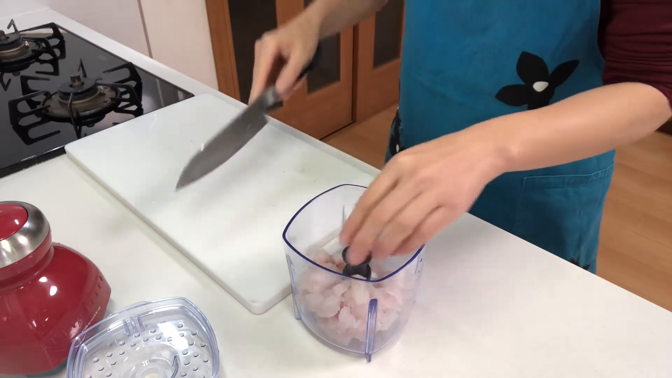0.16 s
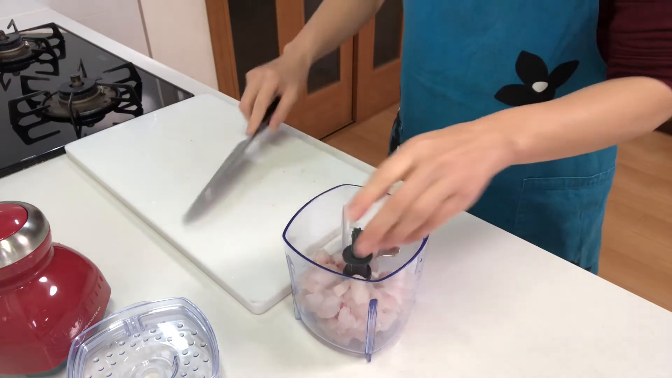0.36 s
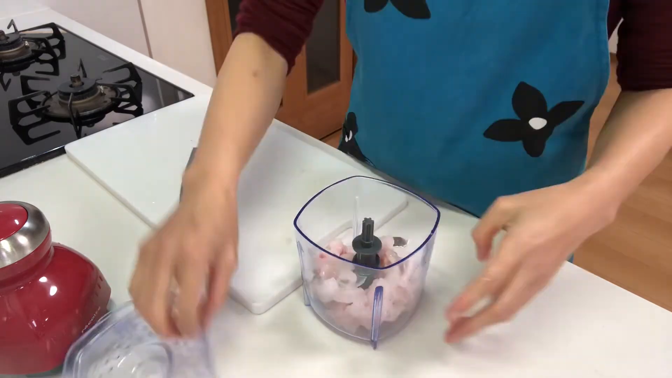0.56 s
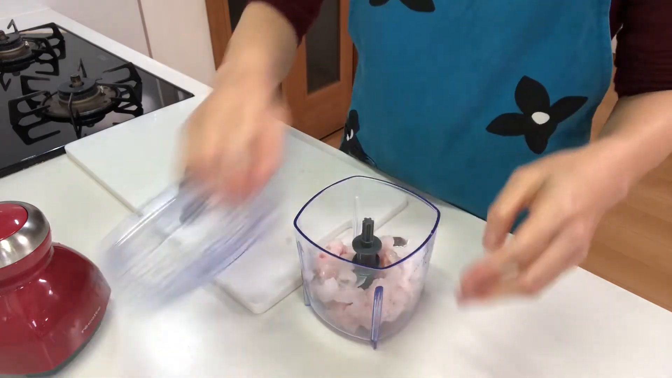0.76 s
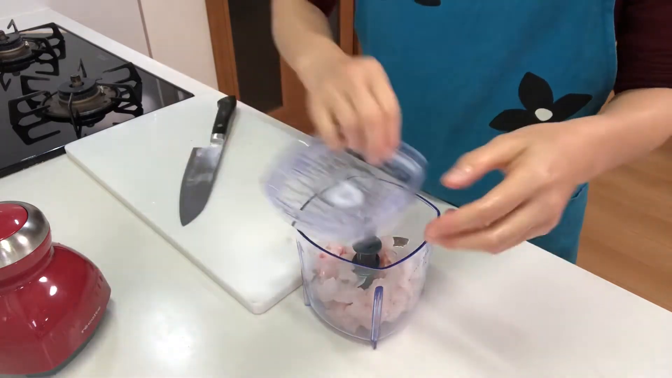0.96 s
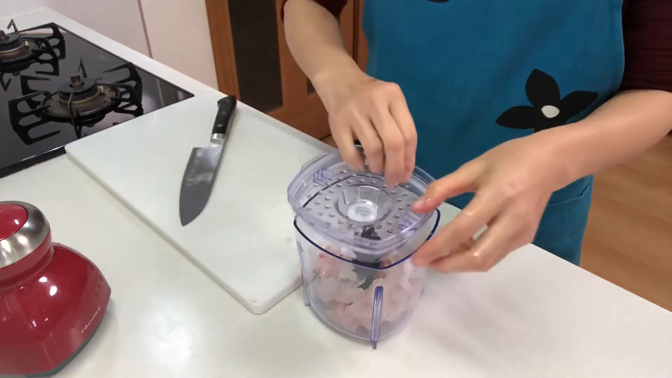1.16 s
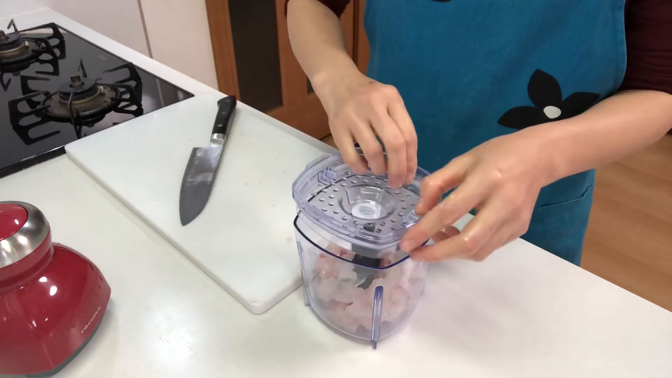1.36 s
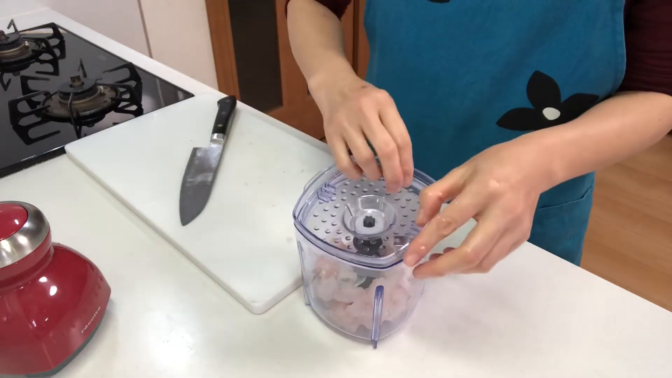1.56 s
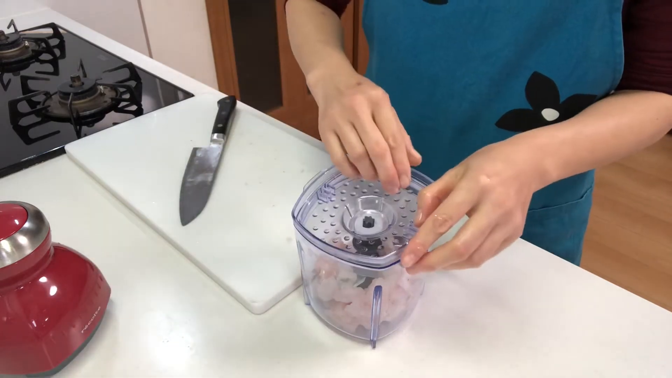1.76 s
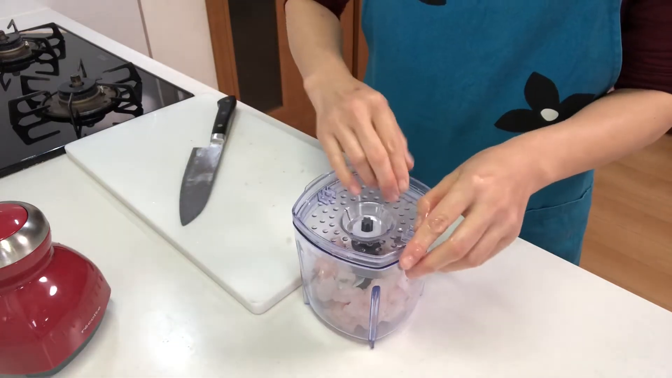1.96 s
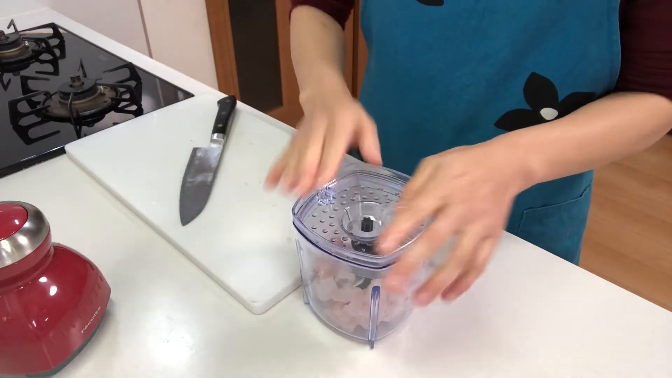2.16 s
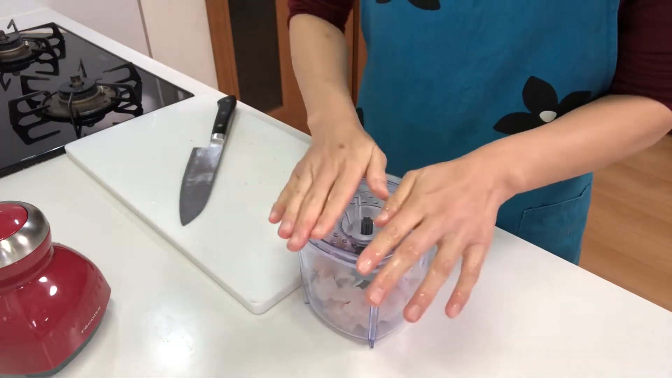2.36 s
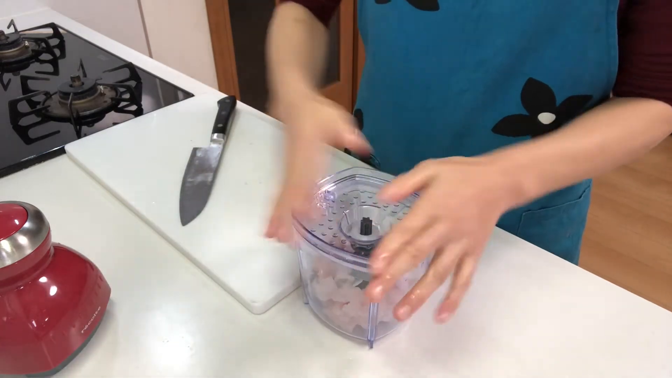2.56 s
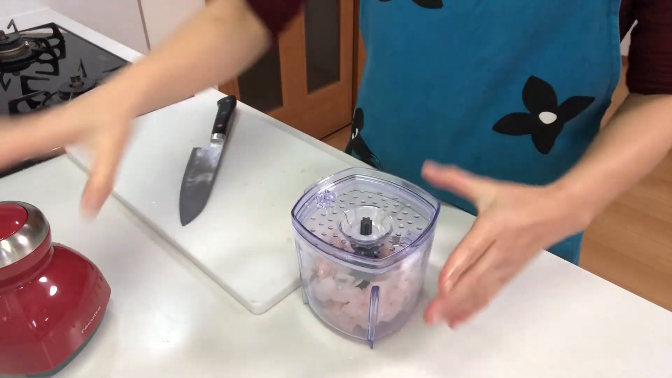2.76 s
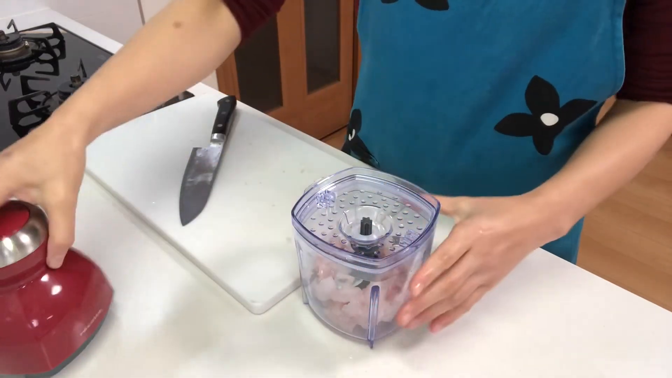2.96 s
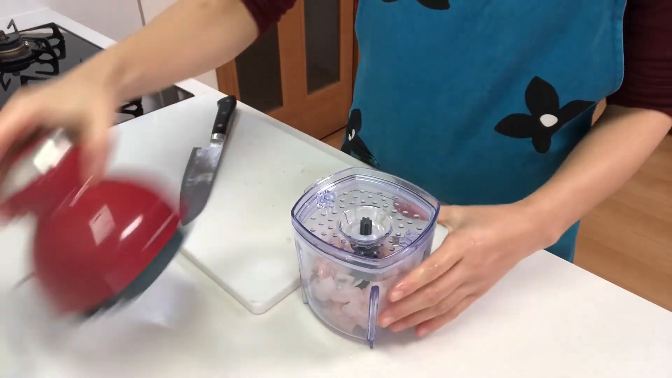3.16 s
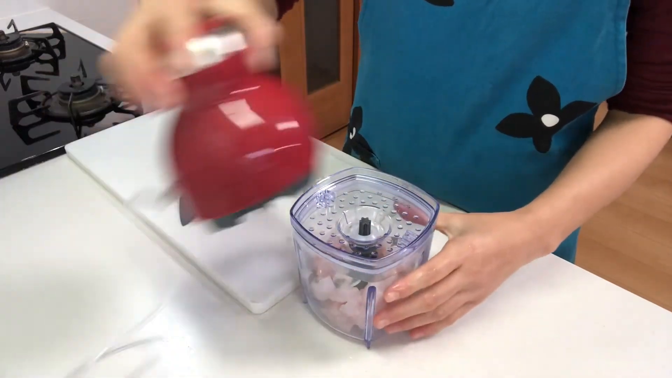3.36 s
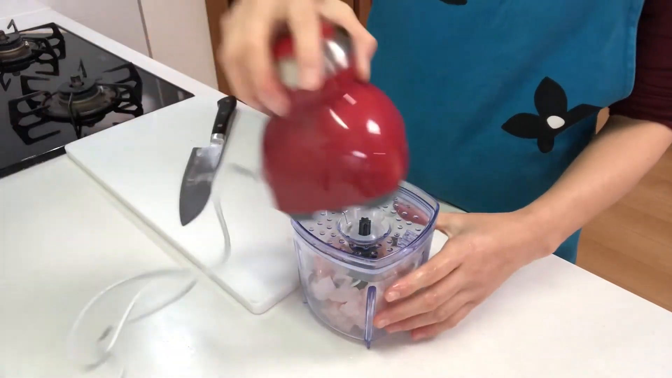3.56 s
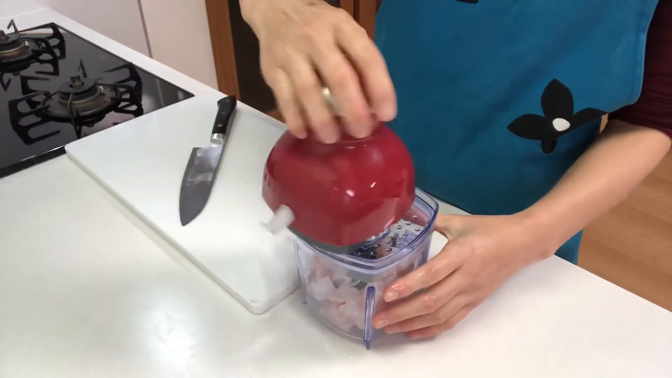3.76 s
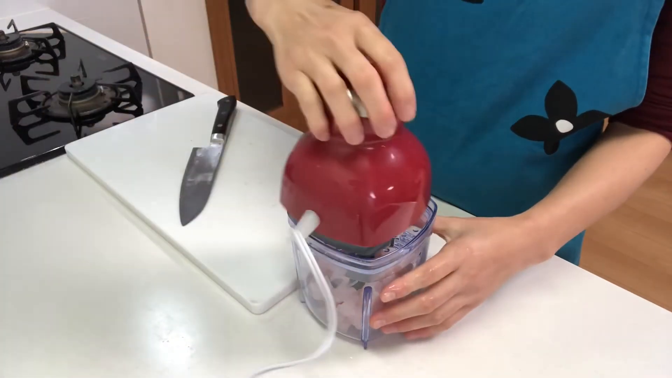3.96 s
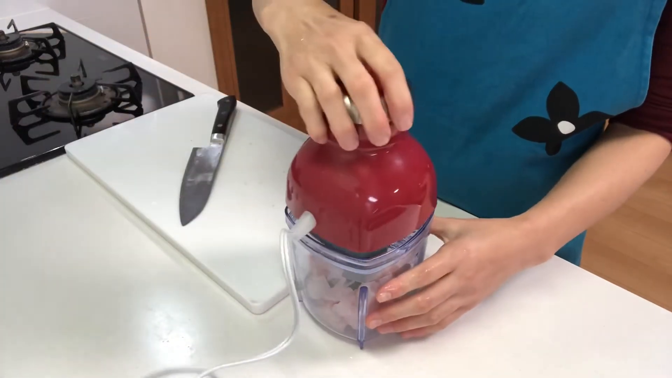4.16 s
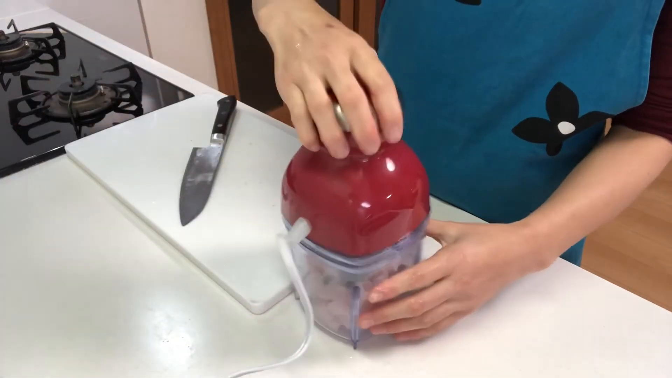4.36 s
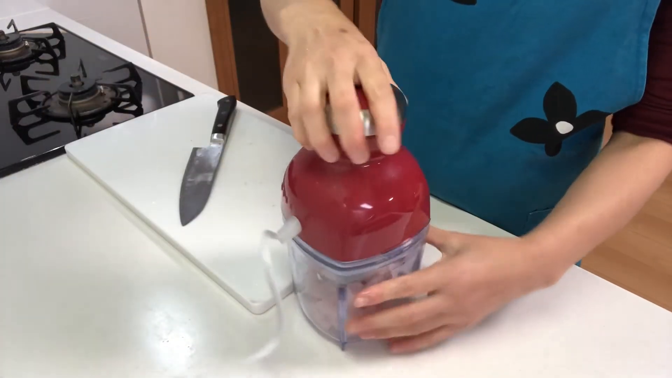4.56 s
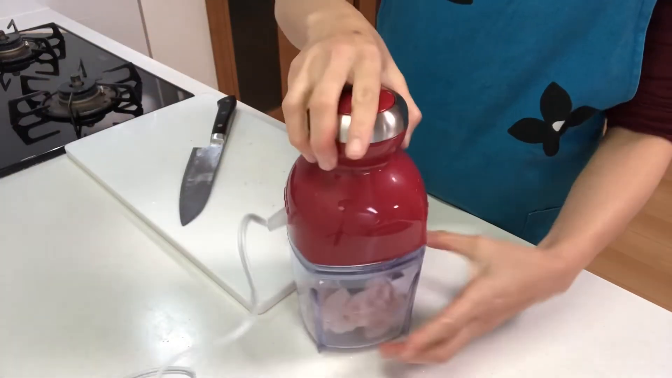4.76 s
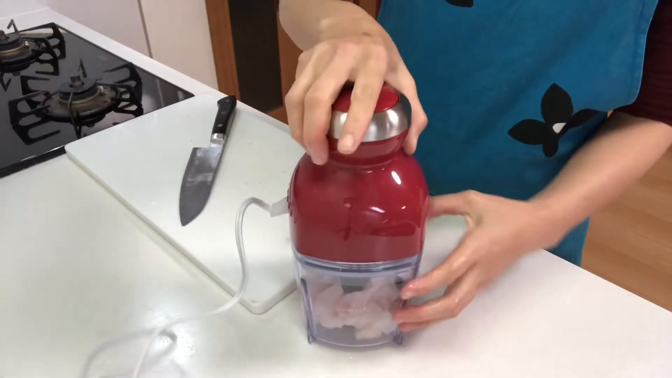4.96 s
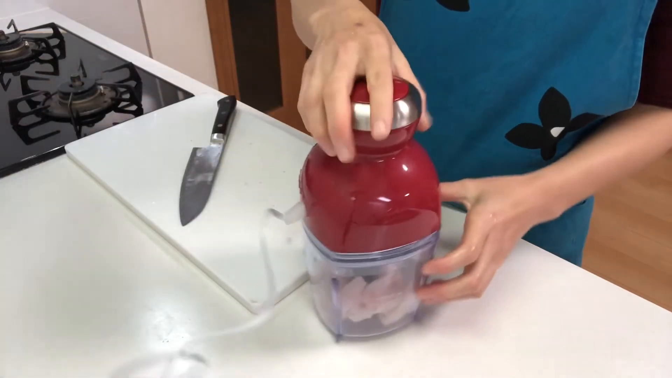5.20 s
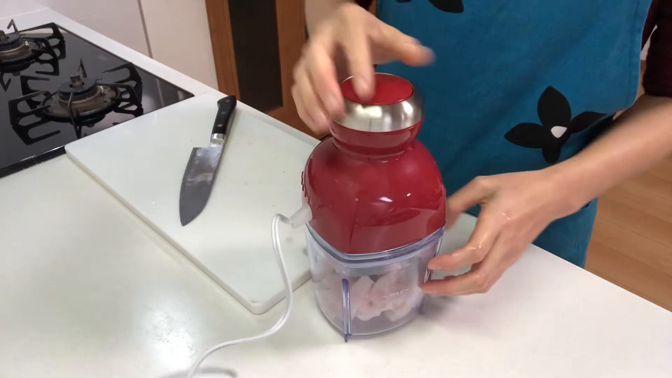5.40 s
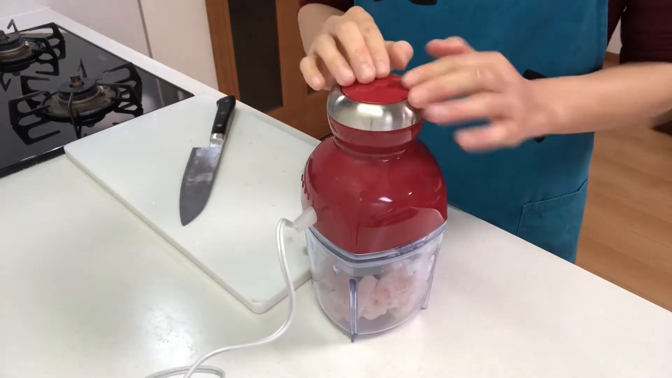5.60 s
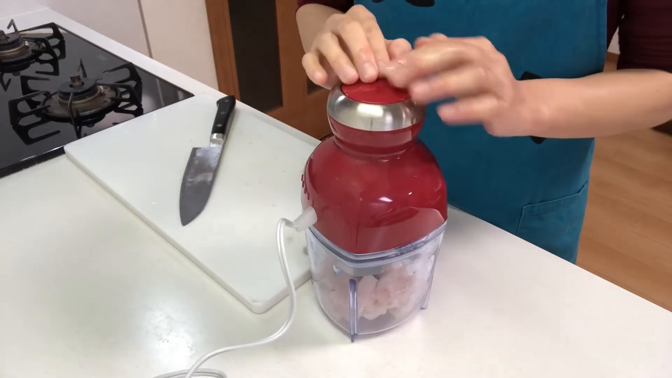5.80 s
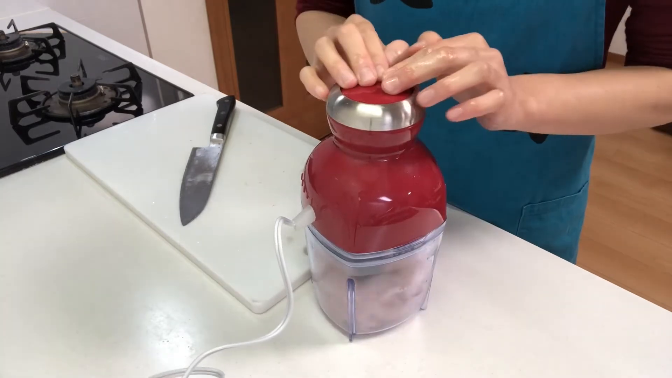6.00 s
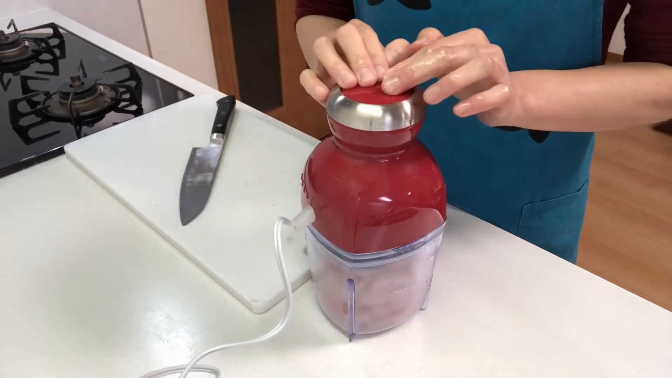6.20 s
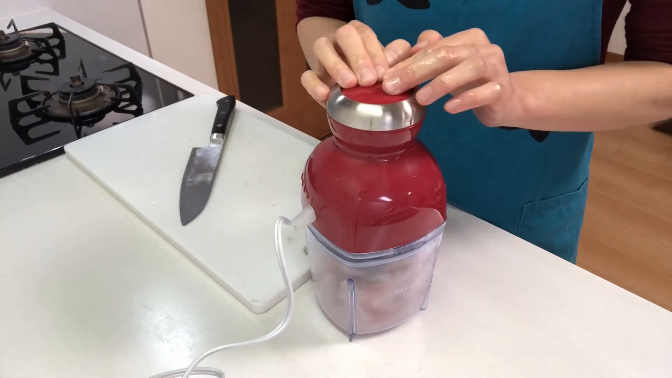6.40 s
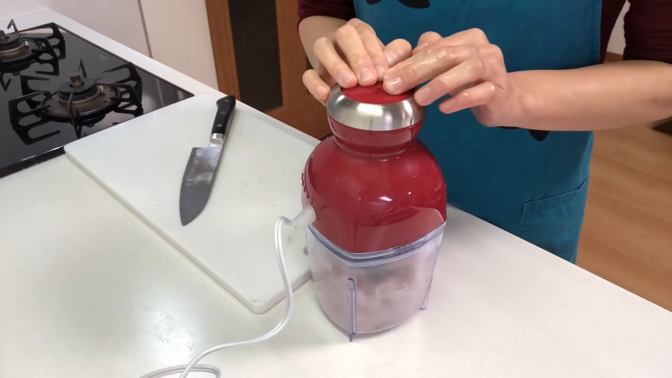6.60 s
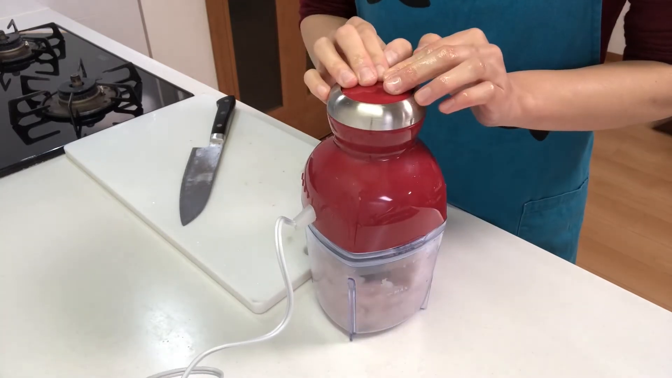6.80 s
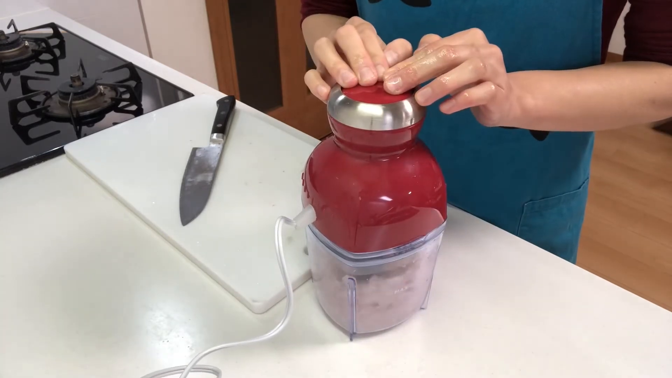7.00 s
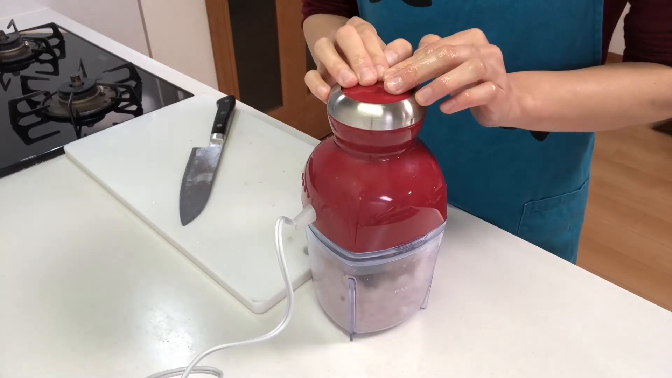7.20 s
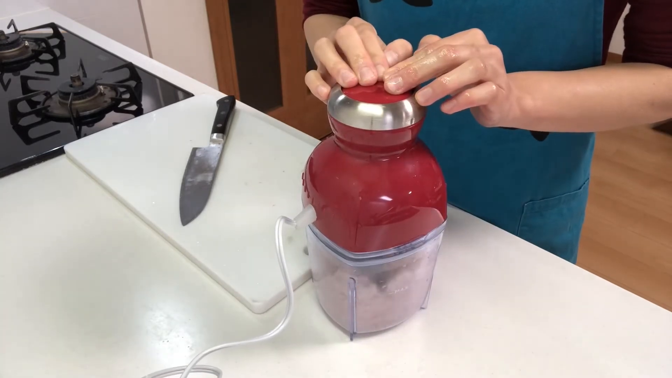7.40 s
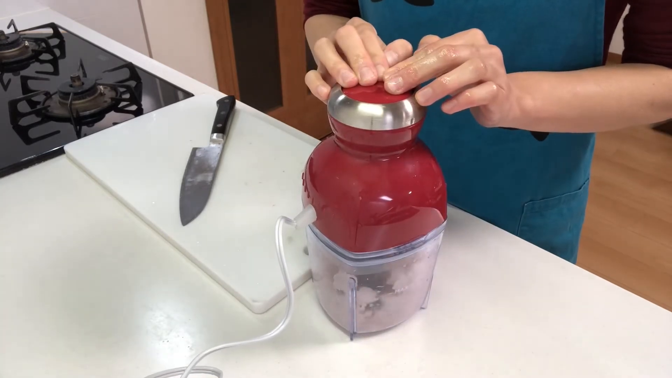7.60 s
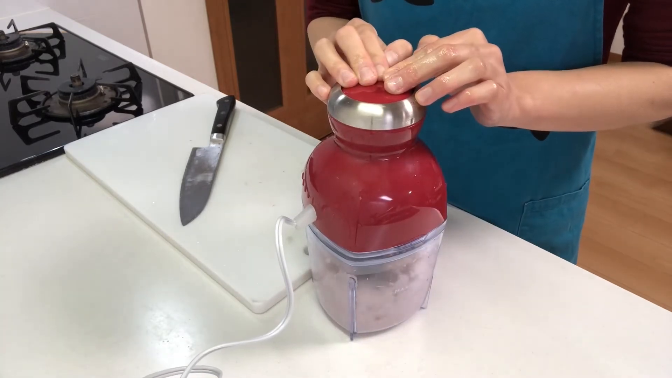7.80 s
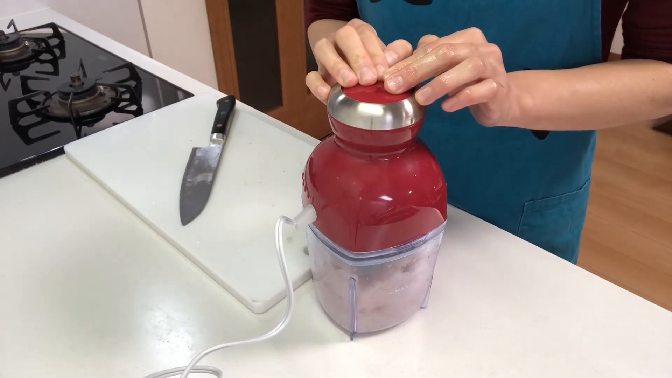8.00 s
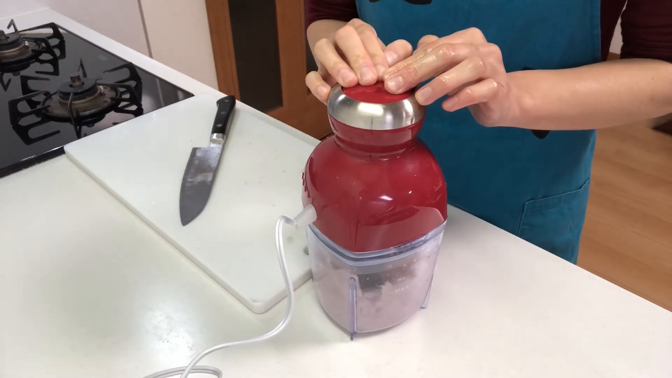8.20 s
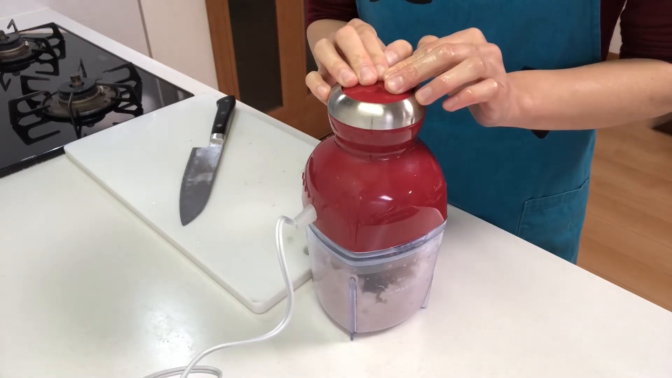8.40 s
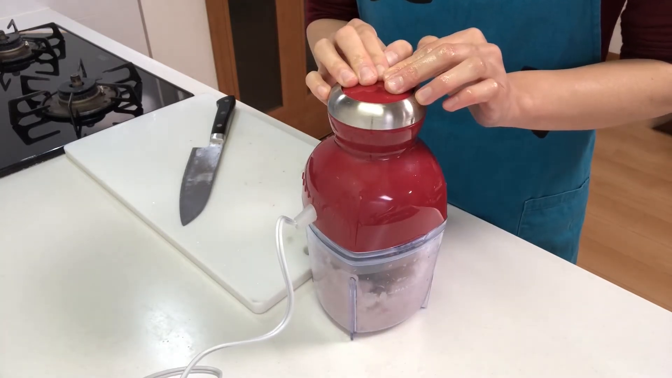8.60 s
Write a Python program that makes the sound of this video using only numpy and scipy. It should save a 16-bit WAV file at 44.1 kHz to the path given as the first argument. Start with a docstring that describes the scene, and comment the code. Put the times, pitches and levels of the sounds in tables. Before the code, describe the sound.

Close, mono and slightly clipped: light ticks, a short knife clack, a dragged plastic lid and hollow bowl knocks with a brief squeak. Quieter handling follows, then a cluster of heavy plastic blows as the motor unit is seated. A split-second motor blip dies away; soon the machine runs to the end, harsh and rattling, with rising whine and irregular food impacts. Short kitchen echoes surround the handling.

```python
"""Faint ticks and taps come first, then a knife is laid on a board: struck steel, as fading sine tones. A
plastic lid scrapes, knocks and squeaks onto a chopper bowl, and a heavy motor head is seated on it: blows are
noise flashes with ringing tones, slides and faint cloth rustle are filtered noise. A short burst of motor sound
starts abruptly and quickly fades; later the motor runs: a climbing gear whine over hum, housing roar and food
hitting the wall. A small hard kitchen echoes the handling; one close mic clips."""
import sys
import numpy as np
from scipy import signal
from scipy.fft import rfft, irfft, next_fast_len
from scipy.io import wavfile
from scipy.ndimage import uniform_filter1d

SR = 44100
rng = np.random.default_rng(int(sys.argv[2]) if len(sys.argv) > 2 else 0)


def generate_wav(sig):
    """Save sig (samples, or channels by samples) to the path in sys.argv[1] as 16-bit PCM at SR."""
    pcm = np.round(np.clip(np.atleast_2d(sig).T, -1, 1) * 32767).astype(np.int16)
    wavfile.write(sys.argv[1], SR, pcm)


N = 381465  # length in samples

# Levels in the tone and spectrum tables only set the balance within each table.
# Motor roar, a short burst and then the long run: t/s, level/dB before a 2.5 dB trim,
# treble/dB over the usual balance
MOTOR_RUNS = [
    [(5.511, -14, -4), (5.533, -15, -4), (5.579, -22.5, -10), (5.605, -43, -7)],
    [(5.91, -30, 6), (5.93, -17, -1), (6.09, -13.5, 0.5), (6.8, -10, -2), (6.9, -11.5, -6.5),
     (8.65, -11, -0.5)],
]
# Spectrum of the roar: f/Hz, level/dB per Hz
ROAR_SPECTRUM = [(25, -38), (55, -8), (130, 0), (210, -4.5), (400, -4), (740, -14.5), (1100, -9.5),
                 (1850, -9), (2050, -13), (3600, -18.5), (4200, -19.5), (5700, -26), (6300, -26),
                 (8500, -38.5)]
# Broad resonances of the motor housing: f/Hz, width/Hz of the first of two filters, level/dB
HOUSING_RESONANCES = [(165.6, 34, -5.5), (264, 54, -1), (492.5, 58, -10), (1310, 730, -10.5),
                      (3380, 700, -9), (5270, 690, -15.5), (7630, 600, -25.5)]
# Whine of the meshing gears, before its small wobbles: t/s, f/Hz, level/dB
GEAR_WHINE = [(5.99, 807, -21), (6.1, 924, -22.5), (6.2, 946, -20.5), (6.3, 1037, -17), (6.5, 1100, -19),
              (6.65, 1090, -23.5), (6.76, 1141, -21), (6.95, 1122, -21.5), (7.1, 1138, -19.5),
              (7.3, 1200, -21.5), (7.45, 1232, -22), (7.6, 1231, -27), (7.69, 1265, -14),
              (7.86, 1236, -23.5), (8.05, 1280, -16.5), (8.2, 1320, -21.5), (8.3, 1298, -22),
              (8.4, 1360, -26), (8.48, 1410, -21), (8.65, 1414, -20.5)]
HUM_HZ, HUM_DB = 120.6, -26.5  # the windings buzz at twice the mains rate
# Large lumps of food slapping the wall: t/s, crack level/dB, clack level/dB, snap level/dB
LARGE_LUMPS = [(6.0286, -15, -19, -38), (6.097, -24, -22, -35), (6.6069, -18, -18, -21),
               (6.729, -11, -4, -24), (6.742, -21, -22, -14), (6.7994, -3, 1, -23), (6.815, -8, -3, -28),
               (6.9522, -9, -4, -21), (7.216, -12, -4, -22), (7.1239, -8, -10, -34), (7.3776, -12, -6, -41),
               (7.434, -19, 1, -38), (7.5131, -4.5, -3, -16), (7.772, -10.5, -4, -47),
               (7.9332, -12, -1, -39), (8.2107, -6.5, 0, -38), (8.2566, -3.5, -9, -40),
               (8.321, -11, -15, -39), (8.3913, -8, -17, -21), (8.4131, -6, -7, -25), (8.4233, -1, -3, -22),
               (8.4492, -12, -13, -18), (8.4826, -1.5, -1, -12.5), (8.553, -3.5, 3.5, -29)]
# Middle levels of the smaller lumps: crack level/dB, clack level/dB, snap level/dB
SMALL_LUMP_DB = (-15, -8, -41)
LUMP_SPREAD_DB, LUMPS_FROM_S, LUMP_GAP_S = 5.5, 5.95, .07  # one lump at random in each gap

# Blows on bowl, lid and head: t/s, crack level/dB, worktop thud level/dB, bowl boom level/dB,
# wall clack level/dB, thud centre f/Hz, clack centre f/Hz
KNOCKS = [(0.195, -56, -37, -47, -37, 113, 1630), (0.2887, -41, -35, -41, -15.5, 280, 1620),
          (0.5031, -28, -24.5, -28, -21.5, 166, 1340), (0.635, -55, -33.5, -47, -54, 150, 1340),
          (1.042, -1.5, -13.5, -5.5, 2.5, 164, 1370), (1.0704, -24.5, -23, -8.5, -12.5, 137, 1260),
          (1.3898, -45, -52, -49, -20, 51.1, 1590), (1.3976, -21, -29, -30, -28, 185, 902),
          (1.408, -19, -18.5, -22, -14, 186, 1570), (1.4483, -31, -17.5, -10, -14, 260, 1230),
          (1.4886, 0, -8.5, -3.5, -5, 269, 1810), (1.8074, -45, -21, -47, -62, 161, 1260),
          (1.922, -29, -30, -34.5, -37, 175, 1630), (1.9818, -53, -32, -45, -49, 161, 1430),
          (2.0315, -28.5, -34, -42, -35, 191, 1250), (2.2196, -29.5, -14.5, -19.5, -20, 206, 1180),
          (2.2541, -33, -27, -31, -35, 118, 1250), (2.3092, -26, -38, -24, -16.5, 135, 1220),
          (2.3233, -32, -15.5, -23, -20, 170, 1150), (2.3451, -31, -30, -24, -27, 116, 1290),
          (2.538, -50, -31, -34, -44, 159, 1470), (2.57, -53, -35, -30, -42, 127, 1420),
          (2.8613, -26, -19, -52, -31, 83.4, 1610), (2.8904, -25.5, -23.5, -45, -36, 143, 1090),
          (3.1375, -42, -49, -39, -39.5, 61.9, 912), (3.576, -59, -54, -45.5, -42.5, 64.6, 1590),
          (3.6842, -5, -5.5, -2, 1, 166, 1490), (3.726, -38, -29, -45, -20, 118, 1570),
          (3.8469, -31, -19.5, -26, -25, 64.6, 1330), (3.928, -28.5, -24.5, -30, -23, 153, 1330),
          (4.0179, -12.5, -6, -17, 0, 283, 1400), (4.0424, -28, -14, -21.5, -36, 53.8, 972),
          (4.1617, -16.5, -9, -12, -13, 140, 1530), (4.2734, -21.5, -7, -30, -20.5, 182, 1320),
          (4.2846, -18, -15.5, -11, -16.5, 170, 1510), (4.335, -13, -17, -15, -10, 215, 1520),
          (4.353, -20, -1, -2, -26, 187, 1880), (4.372, 0.5, -15, -35, -8, 83.4, 1910),
          (4.3908, -21, -17.5, -41, -19, 62.3, 912), (4.4459, -17.5, -18.5, -19, -14.5, 283, 980),
          (4.5452, -38, -27, -37, -32, 269, 1070), (4.605, -37, -29, -27, -51, 240, 929),
          (4.9541, -41, -37, -47, -39.5, 231, 1420), (4.9942, -30.5, -33, -30, -34.5, 183, 958),
          (5.0533, -35, -22.5, -31.5, -30, 266, 1400), (5.2633, -44, -30.5, -50, -45, 161, 977),
          (5.314, -47, -38, -49.5, -35, 299, 1280), (5.3297, -39, -40, -50.5, -33, 299, 1050),
          (5.89, -29, -36, -38, -35, 280, 1040), (5.9222, -11.5, -31, -35, -13.5, 240, 1380)]
# Thin bright ticks of hard edges meeting: t/s, peak level/dB
EDGE_TICKS = [(0.0446, -43), (0.0687, -48), (1.3897, -28), (1.4486, -50), (1.4885, -25), (1.922, -33),
              (1.937, -24), (2.0315, -32), (2.2545, -41), (2.8614, -35), (2.8903, -32), (3.6844, -30),
              (4.0181, -23.5), (4.0413, -29), (4.1617, -33), (4.2735, -40), (4.2845, -26), (4.335, -24),
              (4.353, -27), (5.2629, -43), (5.9144, -32), (5.9224, -36)]
# Ringing tones of the worktop, the bowl and its wall: f/Hz, level/dB, time to fall 60 dB/s
WORKTOP_TONES = [(54.8, -3.5, 0.26), (120, -8.5, 0.27), (153.9, 5.5, 0.089), (183, 1, 0.083),
                 (262, 7.5, 0.056)]
BOWL_TONES = [(382.5, 0.5, 0.064), (445, 2, 0.034), (475.6, 7.5, 0.046), (549.4, -2.5, 0.12),
              (613, -5.5, 0.058), (755, -10, 0.095), (2315, -18, 0.248), (3680, -37, 0.16)]
WALL_TONES = [(915, -26, 0.042), (887, 0.5, 0.038), (1148, -4, 0.031), (1285, 3, 0.015), (1386, 3.5, 0.017),
              (1491, -3, 0.027), (1615, 3, 0.015), (1815, 5.5, 0.0084), (2127, -1.5, 0.022),
              (2350, -10.5, 0.043), (2780, 4.5, 0.0083)]
# Ringing tones of the steel knife: f/Hz, level/dB, time to fall 60 dB/s
KNIFE_TONES = [(196, -6.5, 0.12), (230.3, -2.5, 0.17), (247, -9, .12), (474, -8.5, 0.09), (590, -7, 0.065),
               (646, -12.5, 0.076), (1560, -26, 0.22), (1860, -24, 0.086), (2283, -28, 0.16),
               (2450, -29, 0.2), (3600, -25, .09), (3828, -28, .12), (4400, -25.5, 0.2), (7784, -34, 0.13),
               (10210, -33, .1), (11880, -41, .1), (14500, -42, .1)]
KNIFE_S, KNIFE_DB = .388, -12.5  # steel blade dropped on the board
# Noise of first contact, then of its hardest edge: f/Hz, level/dB per Hz
CRACK_SPECTRUM = [(1200, -28), (2400, 1.5), (3200, 7), (4500, -1), (6500, -7.5), (9000, -21.5),
                  (15000, -49)]
SNAP_SPECTRUM = [(4000, -37), (7500, 9.5), (11000, -0.5), (16000, -4)]
SNAP_DB = -25  # snap of a blow, relative to its crack
HEAD_ON_S, LOW_TONES = 3.6, 6  # with the motor head resting on the lid, only the lowest bowl tones ring
LID_SEATED_S, LOOSE_HZ, SEATED_HZ = 1.3, 563, 460  # the boom sits higher while the lid is loose

# Rubbing strokes, plastic sliding and faint cloth rustle near 4.5 and 5.2 s:
# t/s of the peak, peak level/dB, rise/s, fall/s, centre f/Hz
RUBS = [(.165, -57, 0.019, 0.14, 1540), (1.44, -26, 0.03, .01, 1580), (1.937, -39, 0.044, .03, 5860),
        (2.355, -35.5, .12, .015, 1430), (2.968, -32.5, 0.057, 0.043, 2760),
        (3.705, -34, 0.0096, 0.3, 1700), (3.964, -28, 0.1, 0.047, 1450), (4.354, -7.5, .016, 0.039, 1750),
        (4.5, -44.5, 0.053, 0.26, 1960), (5.2, -55.5, 0.24, 0.28, 2250), (5.89, -29.5, 0.0053, .055, 2900)]
FIZZ_DB = -19.5  # fizz of a rub, relative to its main hiss
# The lid is pulled off the worktop: t/s, level/dB
LID_DRAG = [(0.58, -57), (0.592, -36.5), (0.646, -33), (0.716, -36.5), (0.92, -65)]
# Resonances of the lid: f/Hz, width/Hz of the first filter, level/dB
LID_RESONANCES = [(595, 236, 4.5), (1435, 590, 12.5), (2130, 210, 8.5), (3000, 780, -3), (3670, 500, -10)]
# Hands shifting the bowl on the worktop: t/s of the peak, peak level/dB, rise/s, fall/s
SHUFFLES = [(1.822, -32.5, .06, 0.17), (1.986, -35.5, .02, 0.053), (2.87, -39, 0.056, 0.32),
            (3.745, -30, .02, 0.25), (3.884, -27, .1, 0.029), (3.995, -30, 0.054, 0.011),
            (4.465, -27, 0.018, 0.061), (4.558, -27, 0.037, 0.026), (4.615, -30, 0.032, .05),
            (4.748, -30.5, 0.3, 0.23), (5.006, -40, .1, 0.034), (5.058, -35, 0.019, 0.19),
            (5.268, -53, .04, .15), (5.335, -31, 0.046, 0.038), (5.42, -46, .3, .1),
            (5.605, -45, .02, 0.16), (5.788, -42, 0.057, .07)]
# Spectrum of that rumble: f/Hz, level/dB per Hz
SHUFFLE_SPECTRUM = [(24, -38.5), (40, -14), (117, 1), (183, 0), (360, -5), (500, -6), (719, -20.5),
                    (2500, -37), (3250, -52.5), (5500, -120)]
# Squeaks of the lid rim entering the bowl: t/s of the peak, peak level/dB, f/Hz, half length/s
RIM_SQUEAKS = [(1.429, -7.5, 550, 0.003), (1.447, -4.5, 465, 0.0083), (1.46, 2, 472, 0.0043),
               (1.476, -17, 457, 0.01)]
SWING_DB = 30  # rise and fall times of a stroke are counted from this far under its peak

# Room air noise: f/Hz, level/dB per Hz
AIR_SPECTRUM = [(15, -80), (25, -40), (42, -13.5), (64, -1.5), (92, -11.5), (263, -18), (317, -16),
                (363, -19.5), (545, -24), (591, -17), (962, -28.5), (2910, -34.5), (16000, -48.5)]
AIR_DB, FRIDGE_HZ, FRIDGE_DB = -48.5, 59, -62.5
# How fast the kitchen reflections die: f/Hz, time to fall 60 dB/s
KITCHEN_DECAY = [(125, 0.4), (500, 0.45), (2000, 0.43), (5000, 0.37), (12000, 0.21)]
KITCHEN_DB, TURN_S = -11.5, .23  # three sets of reflections take turns, for an even tail
MIC_HZ, EDGE_HZ = 42.3, 15750  # bass roll-off and upper band limit
RING_SAMPLES = SR // 3  # longest ring of a blow


def motor():
    """The running machine: housing roar, gear whine, winding hum and food hitting the wall."""
    out = np.zeros(N)
    add_roar(out)
    add_whine_and_hum(out)
    add_food_lumps(out)
    return out


def add_roar(mix):
    """Brush and gear rattle drives the housing; small food bits patter on the wall."""
    for rows in MOTOR_RUNS:
        start_s, (level_db, treble_db) = unroll(rows)
        size = len(level_db)
        unevenness_db = 1.75 * wander(size, 0.0022) + 2.0 * wander(size, 0.034)
        rattle = rng.standard_normal(size) * amp(unevenness_db)
        drive = evened(rattle) + 0.52 * patter(size)
        body = np.zeros(size)
        for hz, width, db in HOUSING_RESONANCES:
            body += amp(db) * evened(resonate(resonate(drive, hz, width), hz, 2 * width))
        brush_band = signal.butter(N=1, Wn=[7000, 11000], btype="band", fs=SR, output="sos")
        brushes = evened(signal.sosfilt(brush_band, rattle))
        roar = colour(drive, ROAR_SPECTRUM + [(SR / 2, -70)])
        roar = roar + 0.35 * body + amp(-31.5) * brushes  # the brushes hiss on top
        treble_filter = signal.butter(N=2, Wn=1800, btype="high", fs=SR, output="sos")
        treble = evened(signal.sosfilt(treble_filter, roar))
        roar = evened(roar) * amp(level_db - 2.5)
        roar += treble * amp(level_db - 16.5) * (amp(treble_db) - 1)  # adds or takes away treble
        add(mix, start_s, roar * signal.windows.tukey(size, .004))


def patter(size):
    """Small food bits tick on the wall, each kind at its own pitch; a few are large."""
    t, out = np.arange(600) / SR, np.zeros(size)
    for hz in np.geomspace(700, 9000, num=14):
        strength = amp(3.5 * np.minimum(rng.exponential(1, size), 3))
        bits = strength * (rng.random(size) < 110 / SR)  # about 110 a second
        tick_hz = hz * rng.uniform(0.824, 1.245)
        tick = np.sin(2 * np.pi * tick_hz * t) * np.exp(-t * hz / 1.87)
        out += signal.oaconvolve(bits, evened(tick))[:size]
    return evened(out)


def add_whine_and_hum(mix):
    """Meshing gear teeth sing at a wobbling pitch; the windings hum lower down."""
    start_s, (hz, db) = unroll(GEAR_WHINE)
    size = len(hz)
    t = np.arange(size) / SR
    wobble = 0.006 * wander(size, 0.014) + 0.0074 * wander(size, 0.0044)  # the load jerks the speed
    turns = np.cumsum(hz * (1 + wobble)) / SR
    fuzz = evened(resonate(rng.standard_normal(size), hz, 54))  # worn teeth
    mesh = np.sin(2 * np.pi * turns) + 0.24 * fuzz
    mesh *= np.clip((t - .035) / 0.017, 0, 1)  # it bites once the blade takes load
    add(mix, start_s, np.sqrt(2) * amp(db + 0.7 * wander(size, 0.0033)) * mesh)
    hum_turns = np.cumsum(HUM_HZ * (1 + 0.0037 * wander(size, 0.03))) / SR
    hum = np.sin(2 * np.pi * hum_turns) * np.minimum(t / .15, 1)
    add(mix, start_s, np.sqrt(2) * amp(HUM_DB + 1.8 * wander(size, 0.088)) * hum)


def add_food_lumps(mix):
    """Each lump of food cracks against the wall and makes it ring, damped by the food."""
    damping = amp(-60 * np.arange(RING_SAMPLES) / SR / 0.062)
    for s, crack_db, clack_db, snap_db in [*LARGE_LUMPS, *small_lumps()]:
        clack = ring(WALL_TONES, 0.00035) * damping
        add(mix, s, crack(crack_db, snap_db, 0.0069) + amp(clack_db) * clack)


def small_lumps():
    """Rows of the smaller lumps of food, at random moments and strengths."""
    s = np.arange(LUMPS_FROM_S, N / SR - LUMP_GAP_S, LUMP_GAP_S)
    s = s + LUMP_GAP_S * rng.random(len(s))
    spread = LUMP_SPREAD_DB * rng.standard_normal((len(s), len(SMALL_LUMP_DB)))
    return np.c_[s, SMALL_LUMP_DB + spread]


def knocks():
    """Each blow cracks and sets wall, bowl and worktop ringing; the lower parts build up more slowly."""
    out = np.zeros(N)
    for s, crack_db, thud_db, boom_db, clack_db, thud_hz, clack_hz in KNOCKS:
        bowl = BOWL_TONES if s < HEAD_ON_S else BOWL_TONES[:LOW_TONES]
        boom_hz = LOOSE_HZ if s < LID_SEATED_S else SEATED_HZ
        add(out, s, crack(crack_db, crack_db + SNAP_DB, 0.0069))
        add(out, s, amp(clack_db) * ring(WALL_TONES, 0.0021, clack_hz, fall_db=17.5))
        add(out, s, amp(boom_db) * ring(bowl, 0.0039, boom_hz, fall_db=9.5))
        add(out, s, amp(thud_db) * ring(WORKTOP_TONES, 0.0091, thud_hz, fall_db=8.0))
    for s, db in EDGE_TICKS:
        add(out, s, amp(db) * burst(SNAP_SPECTRUM, 0.0041))
    add(out, KNIFE_S, amp(KNIFE_DB) * knife())
    return out


def knife():
    """The dropped blade rings in its steel tones, with a clack, a crack and a faint worktop thud."""
    steel = ring(KNIFE_TONES, 0.0058, detune=.002)
    steel += amp(-9.5) * ring(WALL_TONES, 0.00058) + crack(-9.5, -21, 0.016)
    steel *= np.clip((.125 - np.arange(len(steel)) / SR) / .02, 0, 1)  # the handle lands and stops the ring
    return steel + amp(-16) * ring(WORKTOP_TONES, 0.0115)


def crack(crack_db, snap_db, t60):
    """First contact makes noise in two treble ranges, the higher one shorter."""
    return amp(crack_db) * burst(CRACK_SPECTRUM, t60) + amp(snap_db) * burst(SNAP_SPECTRUM, 0.49 * t60)


def burst(points, t60):
    """A bright flash of noise at first contact with a faint rattle after it, peak 1."""
    t = np.arange(RING_SAMPLES // 4) / SR
    flash, rattle = amp(-60 * t / t60), amp(-4.5 - 60 * t / 0.044)
    out = colour(rng.standard_normal(len(t)), points) * (flash + rattle)
    return np.pad(out / abs(out).max(), (0, RING_SAMPLES - len(t)))


def ring(modes, rise_s, centre_hz=None, fall_db=0, detune=0.017):
    """A struck part rings in fading tones, peak 1; the landing spot favours tones near a centre."""
    hz, db, t60 = np.transpose(modes)[:, :, None]
    t = np.arange(min(RING_SAMPLES, int(t60.max() * SR))) / SR
    level_chance, pitch_chance = rng.standard_normal((2, len(modes), 1))
    octaves = abs(np.log2(hz / (centre_hz or hz)))
    db = db + 2 * level_chance - fall_db * np.minimum(octaves, 1)  # full fall from an octave away
    tones = amp(db - 60 * t / t60) * np.sin(2 * np.pi * hz * (1 + detune * pitch_chance) * t)
    out = tones.sum(0) * (1 - np.exp(-t / rise_s))
    return np.pad(out / abs(out).max(), (0, RING_SAMPLES - len(t)))


def handling():
    """Rubbing strokes hiss, the shifted bowl rumbles and the lid rim squeaks."""
    out = np.zeros(N)
    add_rubs(out)
    add_lid_drag(out)
    add_shuffles(out)
    add_squeaks(out)
    return out


def add_rubs(mix):
    """Tiny slips of rubbing surfaces hiss in a broad band, with a thin fizz on top."""
    for *stroke, hz in RUBS:
        s, gain = swell(*stroke)
        rub = slips(len(gain))
        hiss = evened(resonate(resonate(rub, hz, 0.47 * hz), hz, 4.7 * hz))
        fizz = evened(np.gradient(rub))
        add(mix, s, gain * (hiss + amp(FIZZ_DB) * fizz))


def add_lid_drag(mix):
    """Tiny slips make the dragged lid sound in its own resonances."""
    s, (level_db,) = unroll(LID_DRAG)
    rub = slips(len(level_db))
    scrape = np.zeros(len(rub))
    for hz, width, db in LID_RESONANCES:
        tone = resonate(rub, hz, width)
        tone = resonate(resonate(tone, 2000, 4060), 2000, 3840)  # softens both far ends
        scrape += amp(db) * evened(tone)
    add(mix, s, amp(level_db) * evened(scrape))


def add_shuffles(mix):
    """The bowl shifting on the worktop rumbles as low noise in uneven lumps."""
    rumble = colour(rng.standard_normal(N) * amp(2.1 * wander(N, 0.014)), SHUFFLE_SPECTRUM)
    for stroke in SHUFFLES:
        s, gain = swell(*stroke)
        add(mix, s, gain * rumble[round(s * SR):][:len(gain)])


def add_squeaks(mix):
    """Each slip of the lid rim is one swelling and fading tone."""
    t = np.arange(-2000, 2000) / SR
    for s, db, hz, half_s in RIM_SQUEAKS:
        add(mix, s + t[0], amp(db) * np.exp(-(t / half_s) ** 2) * np.sin(2 * np.pi * hz * t))


def slips(size):
    """Dense micro-slips of uneven strength, as noise with a quickly changing level."""
    return rng.standard_normal(size) * amp(1.9 * wander(size, 0.00071))


def swell(peak_s, peak_db, rise_s, fall_s):
    """Start time and gain of a stroke that rises and falls straight in dB, with softened ends."""
    t = np.arange(-rise_s, fall_s, 1 / SR)
    gain = amp(peak_db - SWING_DB * np.maximum(-t / rise_s, t / fall_s))
    return peak_s - rise_s, gain * signal.windows.tukey(len(t), .1)


def room_tone():
    """Smooth air noise and a faint, unsteady mains hum."""
    hum = np.sin(2 * np.pi * FRIDGE_HZ * np.arange(N) / SR) * amp(FRIDGE_DB + 3.0 * wander(N, .03))
    air = colour(rng.standard_normal(N), AIR_SPECTRUM)
    return amp(AIR_DB) * air + np.sqrt(2) * hum


def kitchen(x):
    """Sparse reflections of random sign, each band dying at its own speed; three sets take turns."""
    taps = np.zeros((3, SR))
    at = np.arange(300, SR - 20, 20) + rng.integers(0, 20, (3, (SR - 301) // 20))
    np.put_along_axis(taps, at, rng.choice([-1., 1.], at.shape), axis=1)
    hz, t, bands = signal.stft(taps, SR, nperseg=256)
    decay = amp(-60 * t / read(KITCHEN_DECAY, hz)[:, None])
    tail = signal.istft(bands * decay, SR, nperseg=256)[1]
    phase = np.arange(N) / SR / TURN_S + np.arange(3)[:, None] / 3
    turn = np.sqrt(2 / 3) * np.cos(np.pi * phase)  # share of each set
    echoes = signal.fftconvolve(x * turn, tail / np.linalg.norm(tail[0]), axes=1)
    return echoes[:, :N].sum(axis=0)


def amp(db):
    """Turns dB into a plain factor."""
    return 10 ** (np.asarray(db) / 20)


def evened(x):
    """Scales a sound to an rms (average strength) of 1."""
    return x / np.sqrt(np.mean(x ** 2) + 1e-20)


def read(points, hz):
    """Reads a table between its points, along a logarithmic pitch scale."""
    f, value = np.transpose(points)
    return np.interp(np.log(hz + 1), np.log(f + 1), value)


def add(mix, s, sound):
    """Adds a sound to the mix from s seconds on."""
    part = mix[round(s * SR):][:len(sound)]
    part += sound[:len(part)]


def colour(x, points):
    """Filters by a spectrum in dB, then evens to rms 1."""
    size = next_fast_len(len(x))
    gain = amp(read(points, np.fft.rfftfreq(size, 1 / SR)))
    return evened(irfft(rfft(x, size) * gain, size)[:len(x)])


def resonate(x, hz, width):
    """A resonance of gain 1 that follows the curve hz: shift down to zero, smooth, shift back."""
    turn = np.exp(2j * np.pi * np.cumsum(hz * np.ones(len(x))) / SR)
    r = np.exp(-np.pi * width / SR)
    return 2 * (turn * signal.lfilter([1 - r], [1, -r], x / turn)).real


def wander(size, span_s):
    """Slow random drift of rms 1: noise averaged twice over a span."""
    width = max(int(span_s * SR), 2)
    smooth = uniform_filter1d(rng.standard_normal(size), width)
    return evened(uniform_filter1d(smooth, width))


def unroll(rows):
    """Start time and the columns of a curve, sample by sample."""
    s, *columns = np.transpose(rows)
    t = np.arange(s[0], s[-1], 1 / SR)
    return s[0], [np.interp(t, s, c) for c in columns]


def scene():
    """Motor, handling with its kitchen reflections, and room tone, as one channel."""
    struck = knocks() + handling()
    return (motor() + struck + amp(KITCHEN_DB) * kitchen(struck) + room_tone())[None]


def record(dry):
    """The microphone: bass roll-off, hard clipping at full scale, then the upper band limit."""
    bass_cut = signal.butter(4, MIC_HZ, "high", fs=SR, output="sos")
    clipped = np.clip(signal.sosfilt(bass_cut, dry), -1, 1)
    band_limit = signal.firwin(511, EDGE_HZ, window=("kaiser", 9), fs=SR)[None]
    return np.clip(signal.oaconvolve(clipped, band_limit, "same"), -1, 1)


dry = scene()
out = record(dry)
generate_wav(out)
```